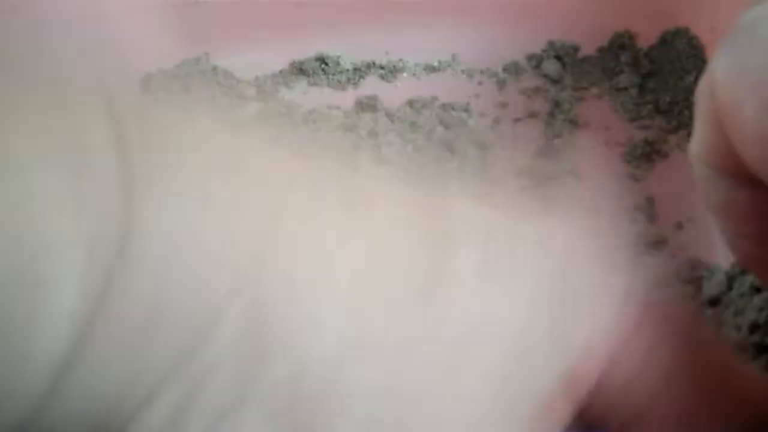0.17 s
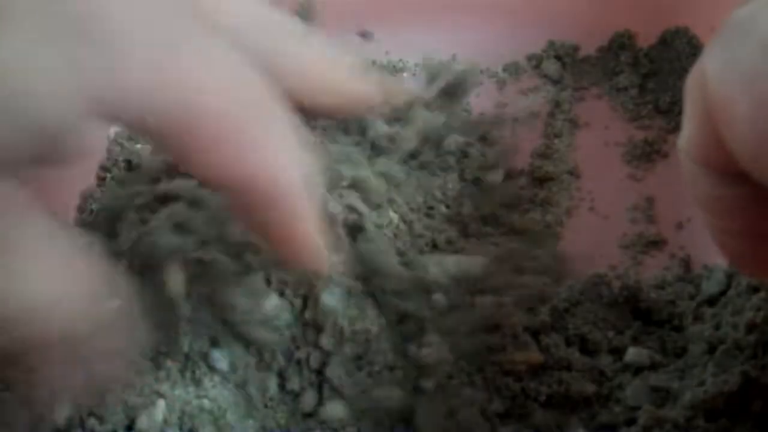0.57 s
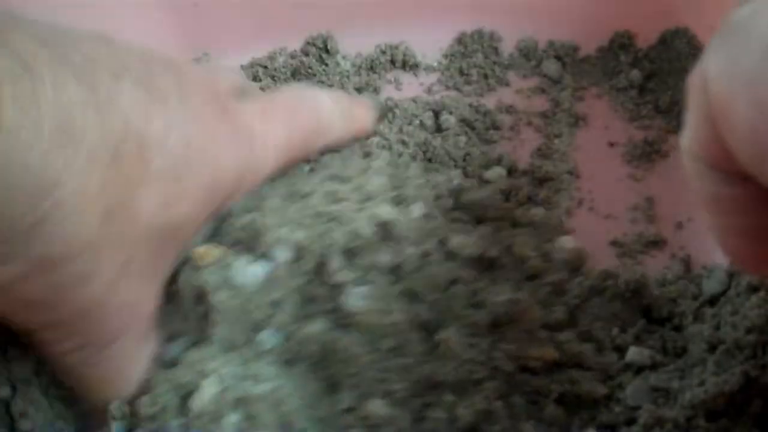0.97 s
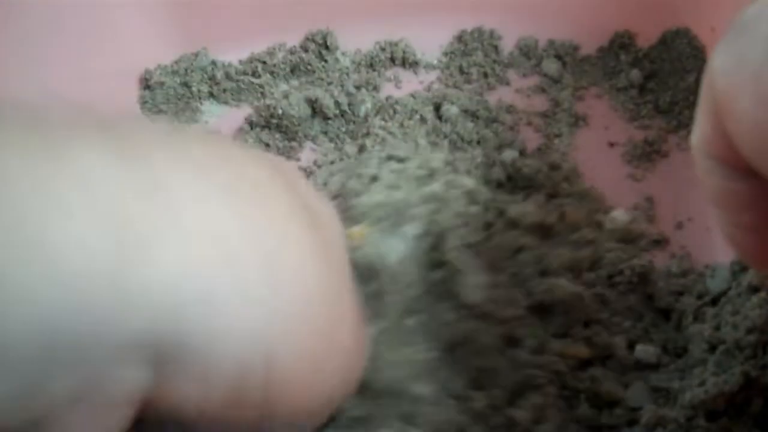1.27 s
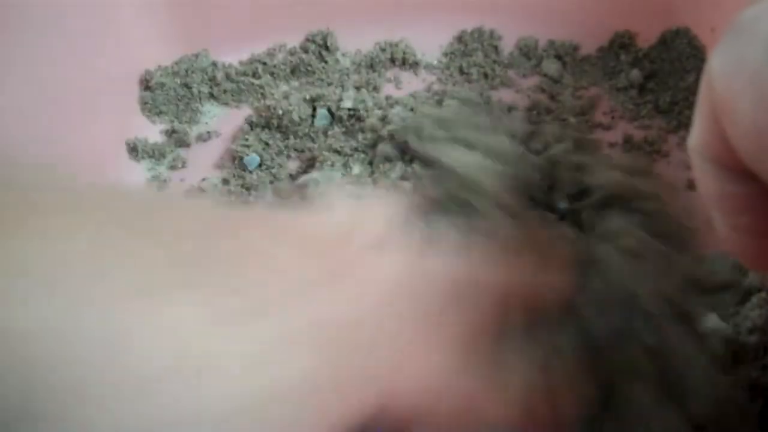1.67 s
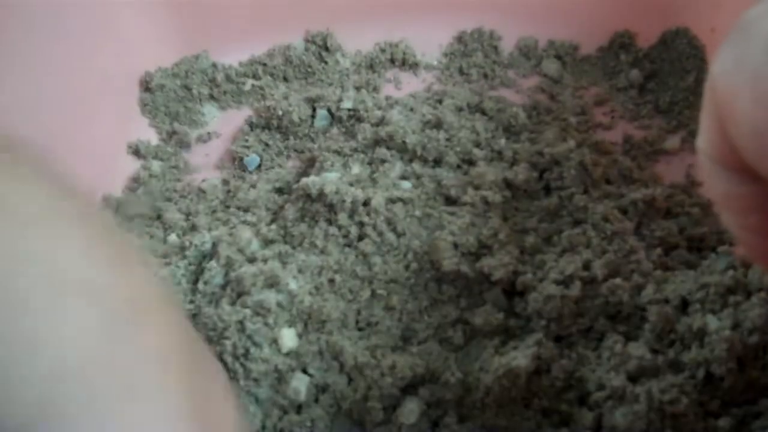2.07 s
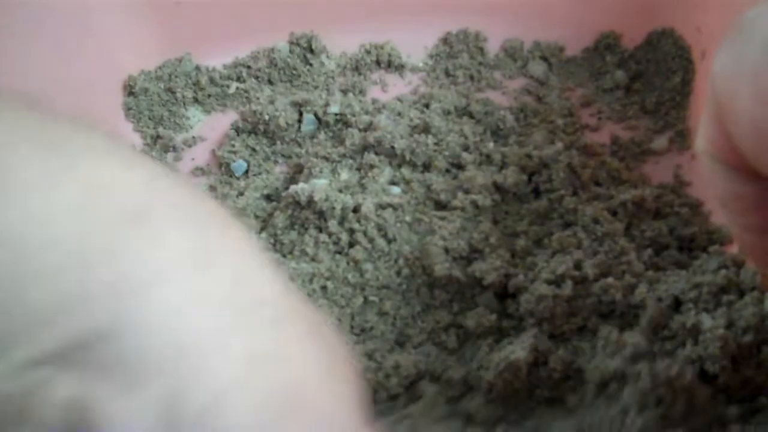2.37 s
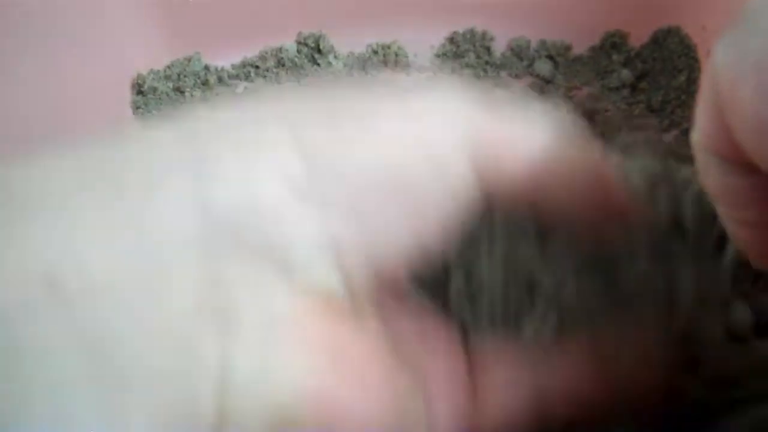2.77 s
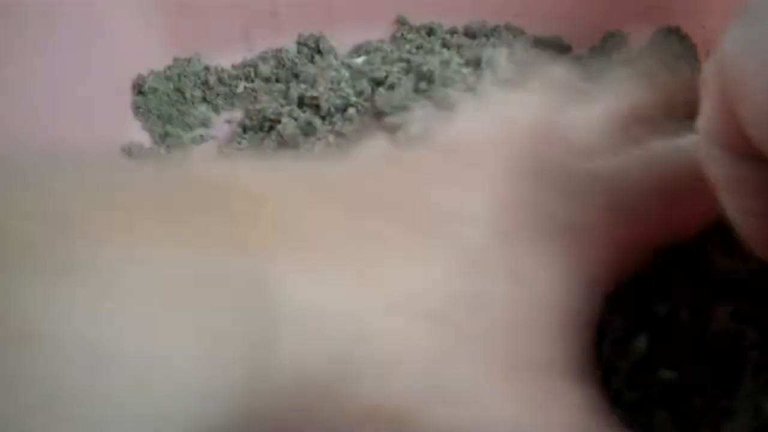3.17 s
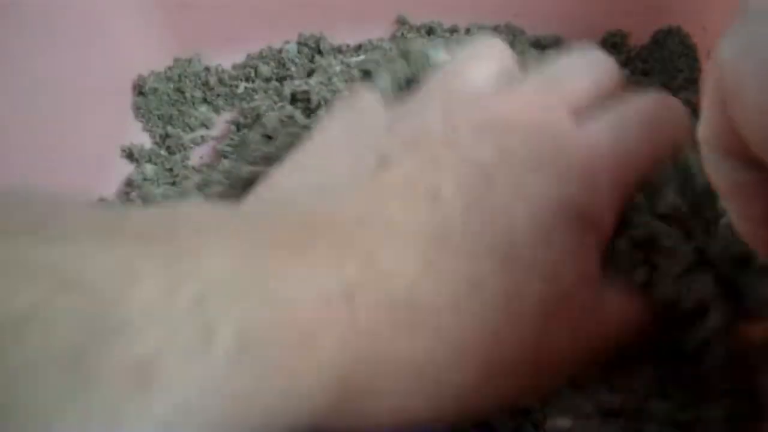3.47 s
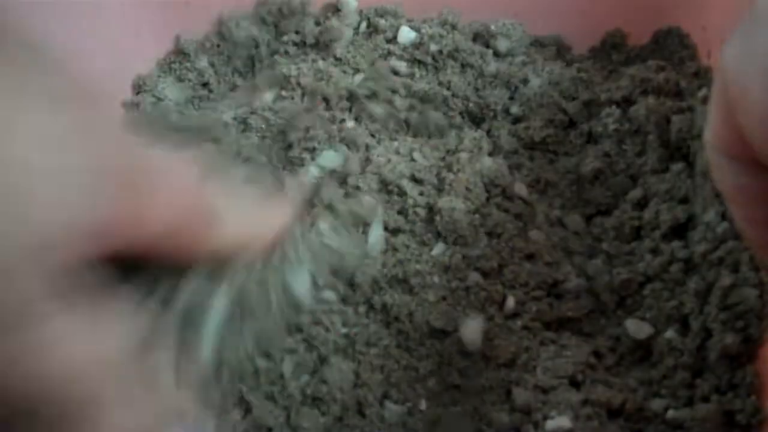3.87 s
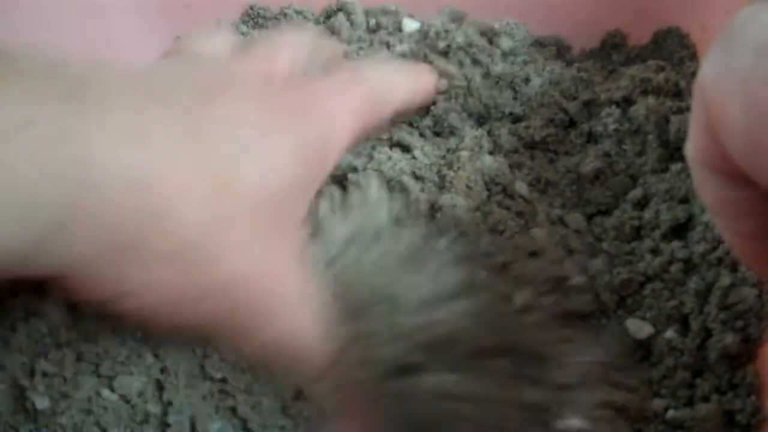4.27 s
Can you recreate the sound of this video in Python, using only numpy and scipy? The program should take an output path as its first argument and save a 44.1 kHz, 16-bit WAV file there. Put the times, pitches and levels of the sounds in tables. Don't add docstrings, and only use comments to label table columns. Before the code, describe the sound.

Close, harsh scrunching of wet sand and small stones worked by hand in a plastic tub, with sharp clicks and dull thumps.

```python
import sys
import numpy as np
from scipy import signal
from scipy.fft import rfft, irfft
from scipy.io import wavfile
from scipy.ndimage import uniform_filter1d

SR = 44100
rng = np.random.default_rng(int(sys.argv[2]) if len(sys.argv) > 2 else 0)


def generate_wav(sig):
    pcm = np.round(np.clip(np.atleast_2d(sig).T, -1, 1) * 32767).astype(np.int16)
    wavfile.write(sys.argv[1], SR, pcm)


def gain_from_decibels(decibels):
    exponent = np.asarray(decibels, float) / 20
    return 10 ** exponent


N = 195054


def evened(x):
    return x / np.sqrt(np.mean(x ** 2) + 1e-20)


def read(points, hz):
    point_hz, value = np.transpose(points)
    return np.interp(np.log(hz + 1), np.log(point_hz + 1), value)


def convolve(x, taps):
    taps = taps.reshape((1,) * (x.ndim - 1) + (-1,))
    return signal.fftconvolve(x, taps / np.linalg.norm(taps), axes=-1)[..., :N]


def colour(x, points):
    hz = abs(np.fft.fftfreq(4096, 1 / SR))
    log_gain = np.log(gain_from_decibels(read(points, hz)))
    response = np.exp(np.conj(signal.hilbert(log_gain)))
    return convolve(x, np.fft.ifft(response).real[:2048])


def ring(x, modes):
    t = np.arange(3000) / SR
    taps = np.zeros(len(t))
    for hz, width_hz, db in modes:
        decay = np.exp(-np.pi * width_hz * t)
        taps += gain_from_decibels(db) * width_hz * decay * np.cos(2 * np.pi * hz * t)
    return convolve(x, taps)


def favour(x, hz, q, db):
    ratio = (np.fft.rfftfreq(x.shape[-1], 1 / SR) + 1) / hz
    resonance = gain_from_decibels(db) / (1 + 1j * q * (ratio - 1 / ratio))
    return irfft(rfft(x) * (1 + resonance), x.shape[-1])


def pair(same, size=(N,)):
    a, b = rng.standard_normal((2, *size))
    return np.stack([a, same * a + np.sqrt(1 - same ** 2) * b], axis=-2)


def sides(pan_db):
    return gain_from_decibels(np.array([pan_db / 2, -pan_db / 2]))


def paths(fine, coarse, wall):
    # point_hz [Hz], level_db [dB]
    fine_spectrum = [(800, -98), (2000, -18), (3200, -5.5), (4200, -1), (6000, 3.5), (15000, -4.5)]
    # point_hz [Hz], level_db [dB]
    grit_spectrum = [(150, -59.5), (400, -18), (750, -7), (1200, -5.5), (2200, -2), (3500, -3),
                     (5000, -12.5), (9000, -39)]
    # pitch_hz [Hz], width_hz [Hz], level_db [dB]
    wall_modes = [(383, 16, -5.5), (753, 110, 5), (829, 40, 4.5), (1174, 180, 4), (1358, 110, -4.5),
                  (2370, 640, -12)]
    size = fine.shape[:-2] + fine.shape[-1:]
    hiss = colour(fine * pair(0.46, size), fine_spectrum)
    crunch = colour(coarse * pair(0.94, size), grit_spectrum)
    blows = uniform_filter1d(wall * pair(0.95, size), size=12)
    return [hiss, crunch, ring(blows, wall_modes)]


def yard():
    # point_hz [Hz], level_db [dB per Hz]
    air_spectrum = [(45, -14), (120, 0), (250, -1.5), (400, -3.5), (1300, -6), (3500, -12), (6500, 1),
                    (8500, -5), (14000, -23)]
    return gain_from_decibels(-48) * colour(pair(0.89), air_spectrum)


def clods():
    # start_s [s], level_db [dB]
    thumps = [
        (0.294, -18.5),
        (2.054, -35),
        (3.344, -23.5),
        (3.955, -24.5),
        (4.195, -32.5),
    ]
    push = np.zeros((1, N))
    for start_s, level_db in thumps:
        push[0, round(start_s * SR):][:60] += gain_from_decibels(level_db - 4.5) * np.hanning(60)
    return ring(push, [(170, 17, -4), (392, 12, 7), (474, 17, 8)])


def knocks():
    # start_s [s], snap_db [dB]
    small_snaps = [(0.084, -9), (0.4378, -7), (0.4514, 2), (0.5834, -19), (0.7879, 1.5), (1.153, 4.5),
                   (1.1656, 0), (1.334, -6), (1.5987, -34), (1.612, -26), (1.8599, -9), (1.9386, -9),
                   (2.1326, -12), (2.172, -11.5), (2.2802, -2.5), (2.4484, -14), (2.5686, 5), (2.5917, 1),
                   (3.5495, 5), (3.6074, -5), (3.6512, -1), (3.9184, -19), (3.9875, -4), (4.0454, 4),
                   (4.056, -1), (4.1927, 2), (4.2004, 0), (4.2129, -8), (4.338, -2.5), (4.3747, 0)]
    # start_s [s], snap_db [dB], crack_db [dB],
    # pitch_hz [Hz]
    stone_cracks = [(0.1601, -18, -16.5, 1990), (0.1753, -21, -22.5, 3980), (0.1826, -21, -23, 2010),
                    (0.2568, -17, -29, 3470), (0.272, -11, -23, 1270), (0.7494, -19, -28, 1930),
                    (0.775, 1.5, -12.5, 2080), (0.8095, 0, -17, 3870), (0.8159, -5, -11, 3740),
                    (0.8997, -16, -36, 3770), (0.9378, -7, -23.5, 2170), (1.567, -24, -19, 2540),
                    (1.6513, -11, -21.5, 3320), (1.6648, -26, -32, 2880), (1.7041, -16, -17, 2600),
                    (1.769, -16, -25, 4150), (1.807, -22, -24.5, 4270), (2.0544, -2, -14.5, 3820),
                    (2.0744, -9, -19, 2270), (2.0862, -30, -17.5, 3180), (2.0926, -15, -23, 3980),
                    (3.2207, -22, -19.5, 2400), (3.25, -6.5, -15.5, 2640), (3.2574, -9, -15.5, 2370),
                    (3.31, -18, -29, 3960), (3.3274, -10.5, -27, 1330), (3.778, -23, -39, 3010),
                    (3.8048, -18.5, -24, 1890), (3.903, -12.5, -20.5, 1950), (4.142, -18, -31, 2630),
                    (0.3216, -5, -24, 1150), (0.3678, -13, -11, 3300), (0.3877, 3.5, -13, 3200),
                    (0.8437, -3, -22, 2230), (1.2428, -2, -19, 3470), (1.6235, -22, -29, 1310),
                    (1.9566, -7, -22.5, 1620), (2.2062, 5.5, -6, 3080), (2.2418, -9, -23, 4120),
                    (2.3064, -1.5, -18, 2340), (2.3094, -13, -19.5, 2250), (2.5849, -3, -35, 2230),
                    (2.7372, -4, -18.5, 2430), (2.7804, -12.5, -19, 2370), (2.9269, -7, -12, 2770),
                    (3.0172, -4, -10.5, 1330), (3.2299, -18, -18.5, 2530), (3.2784, -13.5, -27, 2000),
                    (3.5016, -5, -19, 3350), (3.796, -24, -31, 1910), (3.9011, -16, -29, 2040),
                    (3.9764, -7, -21, 1240), (4.0098, -12, -16.5, 1170), (4.4069, 7.5, -7.5, 3720)]
    # start_s [s], snap_db [dB], crack_db [dB], knock_db [dB], wall_pitch_hz [Hz]
    wall_throws = [(0.2896, -1.5, -10, -19, 1270), (0.2992, 3.5, -9, -14, 783),
                   (0.3082, -11, -18, -15.5, 1150), (0.3344, -23, -28, -20, 716),
                   (0.3444, -11, -28, -26, 740), (0.7178, -20.5, -28, -36, 970),
                   (0.7634, -5, -19, -28, 807), (0.8466, -11, -34, -23.5, 780), (0.8629, 0, -16, -25, 802),
                   (1.4322, -20, -27, -40, 1100), (1.4661, 1.5, -6.5, -13, 870),
                   (1.7381, -11, -17, -20.5, 700), (2.0467, -9, -17, -24, 1400),
                   (2.1374, -3, -36, -29, 877), (3.2744, -14, -23.5, -28.5, 851),
                   (3.3471, -22, -20, -21.5, 1340), (3.9517, -2.5, -10.5, -10, 773),
                   (3.9598, 5.5, -15, -14, 829), (3.9663, -0.5, -12.5, -9, 850),
                   (4.0042, -16, -21, -26, 1070), (4.0169, -15, -27, -24, 818), (4.03, -8, -22, -22, 643),
                   (4.1583, -15.5, -30, -32.5, 820)]
    spot_hz, stone_hz, thrown_hz = 1000, 2200, 1400
    small_ms, thrown_ms = 1.0, 1.4
    rows = []
    for s, snap_db in small_snaps:
        rows.append((s, snap_db, snap_db - 22.5, snap_db - 30, spot_hz, stone_hz, small_ms))
    for s, snap_db, crack_db, hz in stone_cracks:
        rows.append((s, snap_db, crack_db, crack_db - 16, spot_hz, hz, small_ms))
    for throw in wall_throws:
        rows.append((*throw, thrown_hz, thrown_ms))
    s, *columns, ms = np.transpose(rows)
    side, size, hop = rng.standard_normal((len(rows), 3)).T
    pan_db = -1.2 + 3.1 * side
    length_ms = ms * np.exp(0.39 * size)
    hop_ms = 1.6 * np.exp(0.5 * hop)
    return np.array([s + 0.0007, *columns, pan_db, length_ms, hop_ms])


def pebbles():
    s, snap_db, crack_db, knock_db, spot_hz, stone_hz, pan_db, ms, hop_ms = knocks()[:, :, None, None]
    t_ms = np.arange(1000) * 1000 / SR

    def blow(since_ms):
        return (1 - np.exp(-since_ms / 0.18)) * np.exp(-since_ms / (0.56 * ms))

    bounce = gain_from_decibels(-8.0) * blow(np.maximum(t_ms - hop_ms, 0))
    rattle = 0.023 * np.exp(-t_ms / 14.5)
    shape = blow(t_ms) + bounce + rattle
    snap, crack, thud = paths(shape, shape, shape)
    crack = favour(crack, stone_hz, q=4.0, db=7.0)
    thud = favour(thud, spot_hz, q=1.5, db=6.0)
    starts = np.round(s.ravel() * SR).astype(int)
    out = np.zeros((2, N + 4000))
    for sound, db in (snap, snap_db + 9.0), (crack, crack_db + 17.5), (thud, knock_db + 23.0):
        energy = (sound ** 2).sum(-1, keepdims=True)
        sound = sound * gain_from_decibels(db) * np.sqrt(ms / energy)
        for at, knock, side_db in zip(starts, sound, pan_db.ravel()):
            out[:, at:at + knock.shape[1]] += knock * sides(side_db)[:, None]
    return out[:, :N]


def hand():
    # start_s [s], hold_s [s], sand_db [dB], grit_over_sand_db [dB]
    stir_surges = [(0, 0.037, -10.5, -19.5), (0.064, 0.079, -23, -6.5), (0.162, 0.038, -43, -2),
                   (0.46, 0.049, -13.5, -12), (0.522, 0.027, -23.5, -7), (0.973, 0.4, -21.5, -9),
                   (1.125, 0.051, -14, -16.5), (1.321, 0.02, -17, -16.5), (1.422, 0.11, -22.5, -6.5),
                   (1.773, 0.06, -28.5, -11.5), (1.867, 0.1, -25.5, -9), (2.282, 0.031, -17, -11),
                   (2.387, 0.029, -17, -9), (2.422, 0.46, -19.5, -9), (2.505, 0.026, -18.5, -9),
                   (2.555, 0.028, -16, -13.5), (2.869, 0.11, -21, -3), (2.987, 0.039, -24, 0.5),
                   (3.479, 0.024, -12, -10.5), (3.552, 0.079, -13.5, -12.5), (3.676, 0.063, -27.5, -2.5),
                   (4.363, .09, -14, -16)]
    # start_s [s], hold_s [s], sand_db [dB], grit_over_sand_db [dB]
    sudden_jabs = [(0.278, .012, -27, -11), (0.287, 0.04, -24, -3), (0.3618, 0.063, -15.5, -11),
                   (0.742, 0.16, -32, -7.5), (2.028, .015, -31, -14), (2.037, 0.041, -28.5, -6.5),
                   (2.13, 0.019, -27.5, -5), (2.196, .008, -29, -8), (2.209, 0.039, -23, -7.5),
                   (3.216, 0.054, -30.5, -11.5), (3.334, .012, -31.5, -9), (3.351, 0.09, -26, -7.5),
                   (3.95, 0.086, -30, -3), (4.04, 0.065, -29, -12.5), (4.185, .02, -30.5, -6)]
    start, hold, sand_db, grit_db = np.transpose(stir_surges + sudden_jabs)[:, :, None]
    t = np.arange(0, N + 64, 64) / SR
    rise_db_per_s = np.repeat([325, 6000], [len(stir_surges), len(sudden_jabs)])[:, None]
    rise_db = rise_db_per_s * np.maximum(start - t, 0)
    after = np.maximum(t - start - hold, 0)
    wall_db = sand_db + grit_db - 10.5 + 0.31 * (sand_db + 25.5)
    grit_haste = 1.11
    levels_db = []
    for db, haste in (sand_db, 1), (sand_db + grit_db, grit_haste), (wall_db, grit_haste):
        fall = gain_from_decibels(-302 * haste * after) ** 2
        trickle = gain_from_decibels(-14 * haste - 110 * after) ** 2
        power = gain_from_decibels(db - rise_db) ** 2 * (fall + trickle)
        levels_db.append(10 * np.log10(power.sum(0)))
    pan_db = -0.5 + 0.0355 * (levels_db[0] + 20)
    return [np.interp(np.arange(N) / SR, t, curve) for curve in levels_db + [pan_db]]


def slips(per_s, spread_db, ms):
    size = gain_from_decibels(spread_db * np.minimum(rng.exponential(1, N), 4))
    size = size * (rng.random(N) < per_s / SR)
    power = signal.lfilter([1], [1, -np.exp(-1000 / (ms * SR))], size ** 2)
    return power / power.mean()


def patchy(x, patchy_db):
    z = signal.stft(x, nperseg=256)[2]
    field = rng.standard_normal(z.shape[1:])
    field = uniform_filter1d(field, size=4, axis=0)
    field = uniform_filter1d(field, size=20, axis=1)
    return signal.istft(z * gain_from_decibels(patchy_db * evened(field)), nperseg=256)[1][:, :N]


def sand():
    *levels_db, pan_db = hand()
    clumps = 1.0 + 0.3 * slips(per_s=200, spread_db=5.0, ms=4.0)
    grains = slips(per_s=2000, spread_db=-4.5, ms=0.59)
    share = np.array([[0.3], [0.4], [0.3]])
    texture = np.sqrt(clumps * (1 - share + share * grains))
    force = gain_from_decibels(np.array(levels_db) + [[-0.6], [0.6], [0.6]]) * texture
    return patchy(sum(paths(*force[:, None] * sides(pan_db))), patchy_db=2.5)


def ports(x):
    # point_hz [Hz], level_db [dB]
    left_whistle = [(60, -31.5), (300, -2), (4000, 0.5), (5500, 2), (6500, 5.5), (7250, 10.5), (8000, 6),
                    (9500, -4.5), (12000, -7), (14200, -8)]
    # point_hz [Hz], level_db [dB]
    right_whistle = [(60, -18), (300, -2), (4000, 0.5), (5000, 4.5), (5900, 5), (6700, 3.5), (7500, -4.5),
                     (9500, -16.5), (12000, -25.5), (14200, -58)]
    hz = np.fft.rfftfreq(N, 1 / SR)
    left, right = gain_from_decibels(-2.0) * colour(x, left_whistle)
    change_db = read(right_whistle, hz) - read(left_whistle, hz)
    return np.array([left, irfft(rfft(right) * gain_from_decibels(change_db), N)])


def scene():
    return ports(sand() + pebbles() + clods()) + yard()


def overdrive(left):
    # start_s [s], thud_db [dB]
    overdriven_peaks = [(0.0064, -40.5), (0.0145, -45), (0.2945, -30.5), (0.322, -37), (0.344, -49),
                        (0.373, -51), (0.3929, -41), (0.4582, -42), (0.8123, -30.5), (0.8644, -21),
                        (1.1348, -53), (1.167, -27.5), (1.4686, -35), (2.141, -57), (2.152, -54),
                        (2.2085, -21.5), (2.4498, -33.5), (2.5777, -38), (2.5852, -35), (3.3504, -42),
                        (3.4874, -40.5), (3.5646, -44), (3.5805, -40), (3.9603, -27), (3.966, -25),
                        (4.0455, -15), (4.0577, -30.5), (4.201, -29), (4.3708, -40.5), (4.406, -31)]
    out = left.copy()
    window = np.hanning(60)
    for start_s, thud_db in overdriven_peaks:
        at = round(start_s * SR) - 30
        rectified = abs(left[at:at + 60])
        rectified = rectified / np.average(rectified, weights=window)
        out[at:at + 60] -= gain_from_decibels(thud_db + 18.5) * window * (1 + 1.94 * (rectified - 1))
    return out


def top_cut(x):
    return signal.sosfilt(signal.butter(12, 15500, fs=SR, output="sos"), x)


def record(dry):
    driven = np.array([overdrive(dry[0]), dry[1]])
    over = np.maximum(abs(driven) - 0.62, 0)
    railed = driven - np.sign(driven) * (over - 0.3 * np.tanh(over / 0.3))
    lowpass = signal.firwin(255, 14280, window=("kaiser", 9), fs=SR)
    limited = signal.oaconvolve(railed, lowpass[None], "same", axes=1)
    return top_cut(limited + 0.22 * (railed - driven))


dry = scene()
out = record(dry)
generate_wav(out)
```